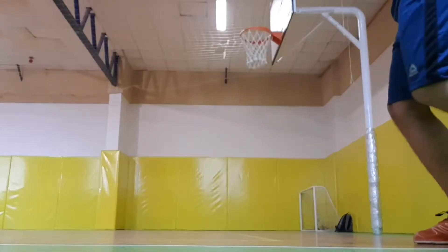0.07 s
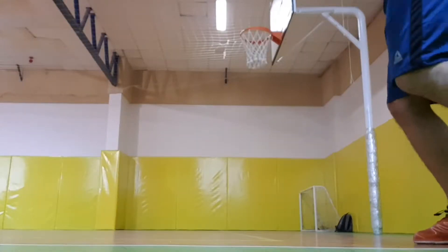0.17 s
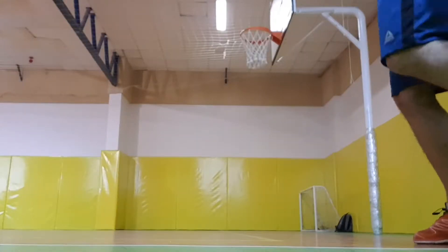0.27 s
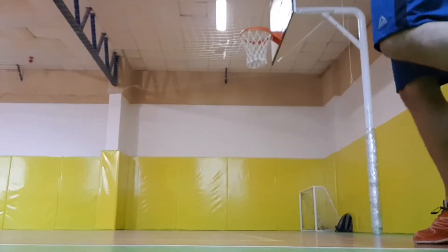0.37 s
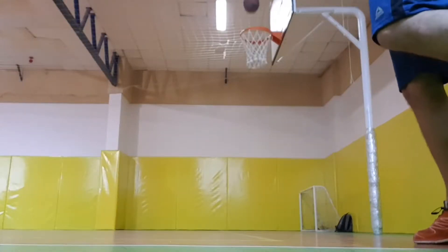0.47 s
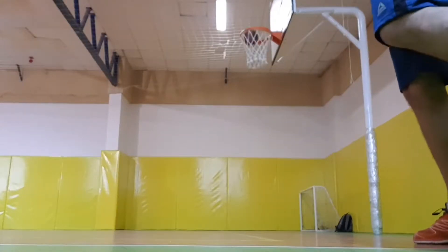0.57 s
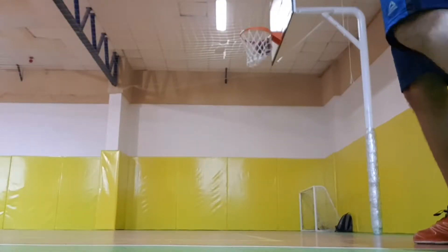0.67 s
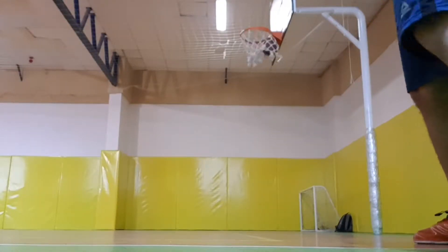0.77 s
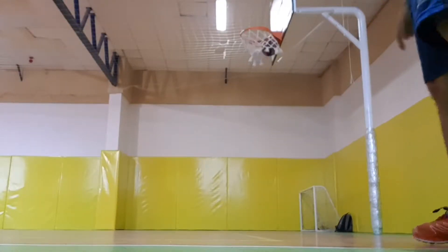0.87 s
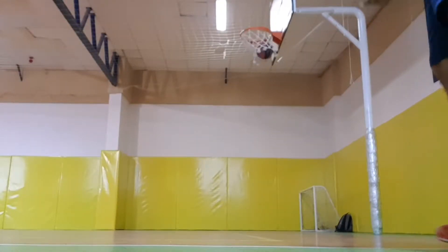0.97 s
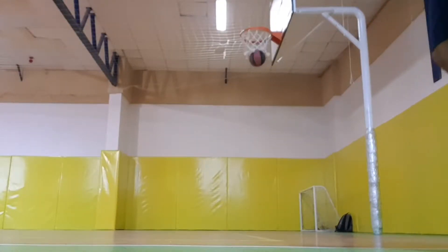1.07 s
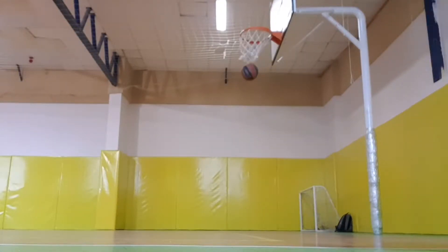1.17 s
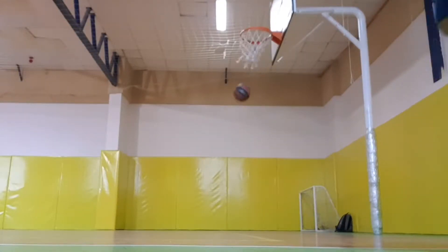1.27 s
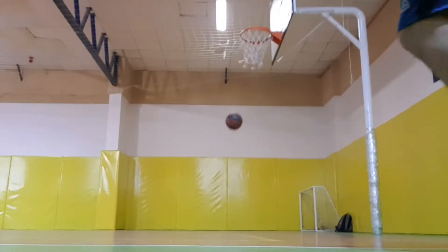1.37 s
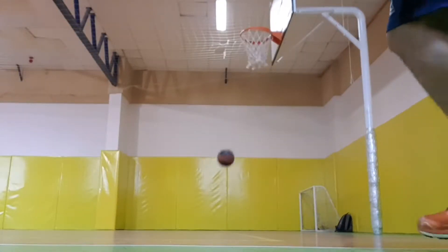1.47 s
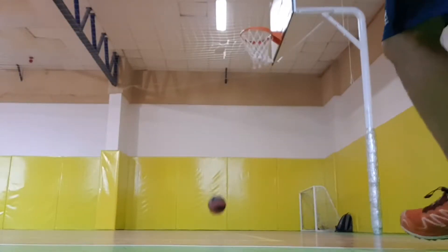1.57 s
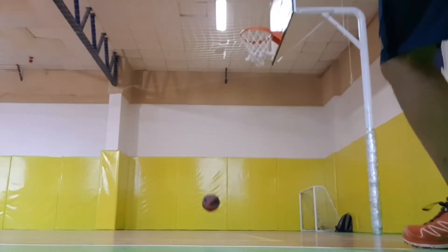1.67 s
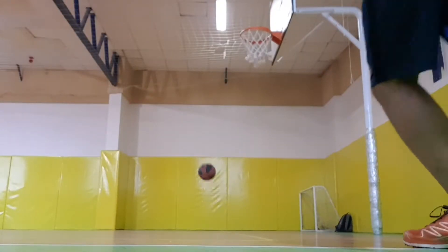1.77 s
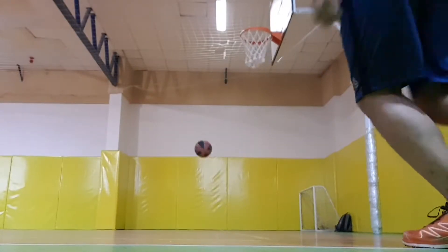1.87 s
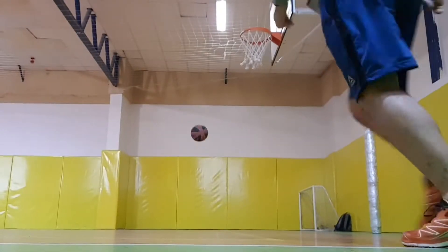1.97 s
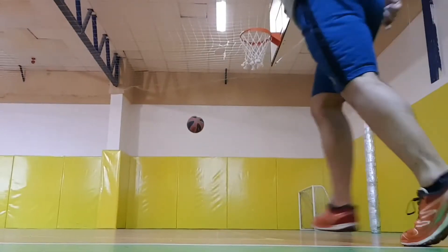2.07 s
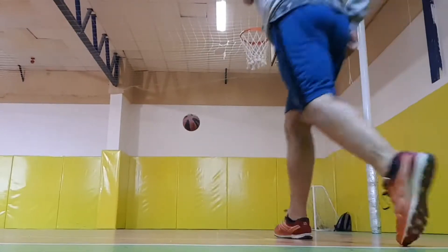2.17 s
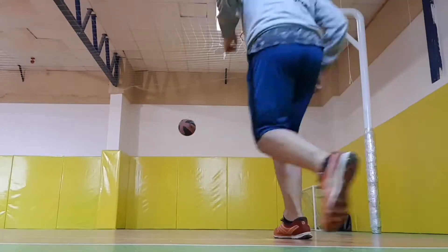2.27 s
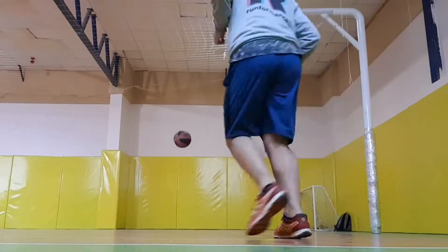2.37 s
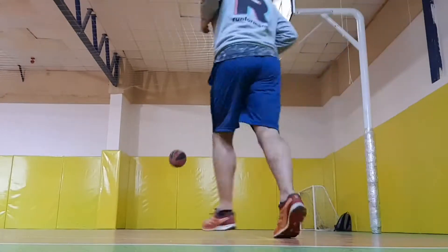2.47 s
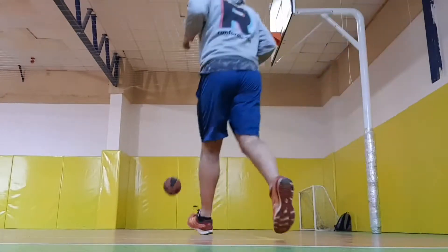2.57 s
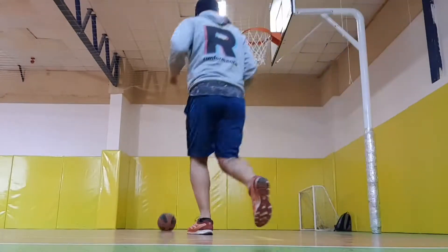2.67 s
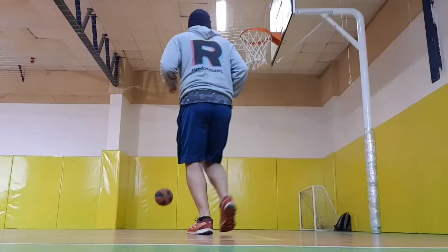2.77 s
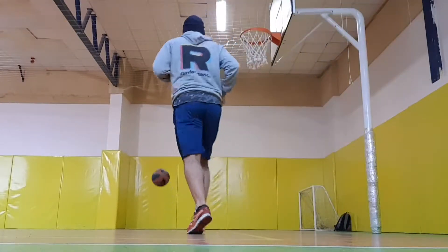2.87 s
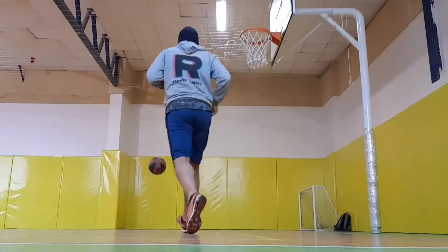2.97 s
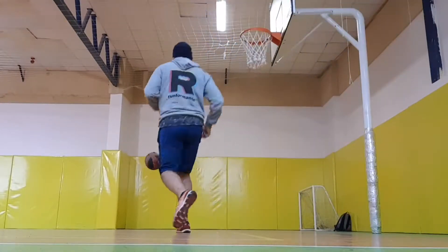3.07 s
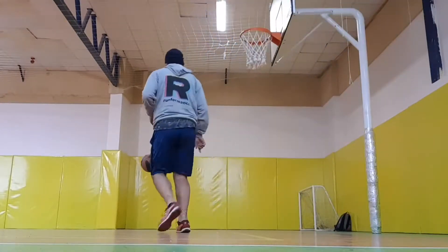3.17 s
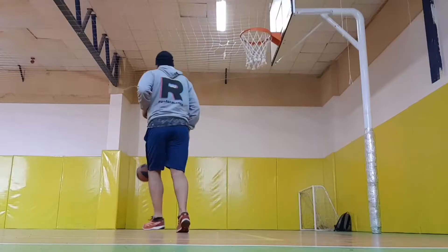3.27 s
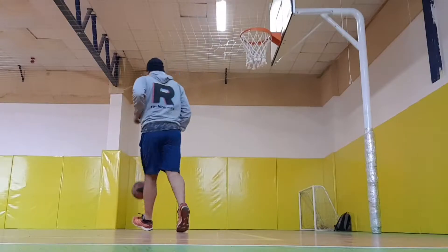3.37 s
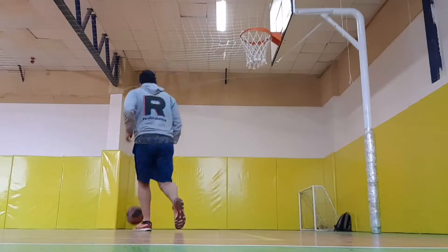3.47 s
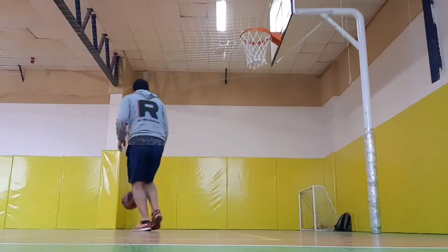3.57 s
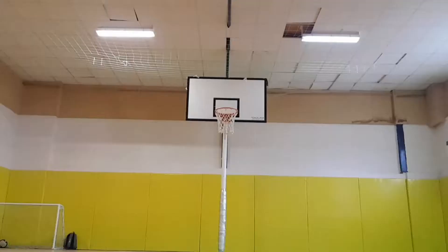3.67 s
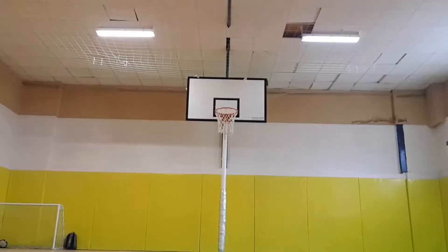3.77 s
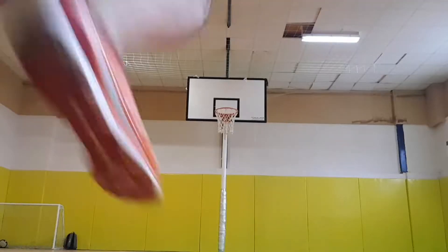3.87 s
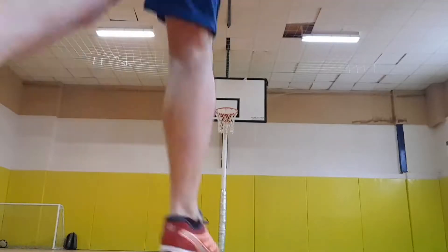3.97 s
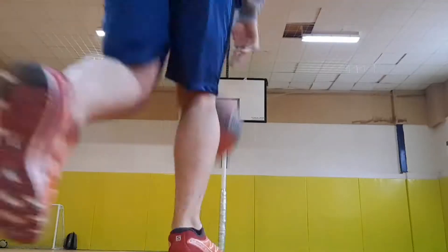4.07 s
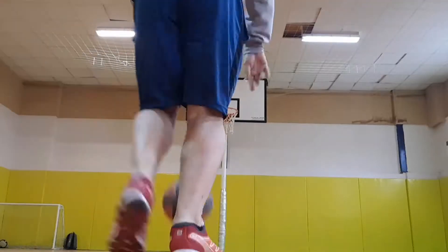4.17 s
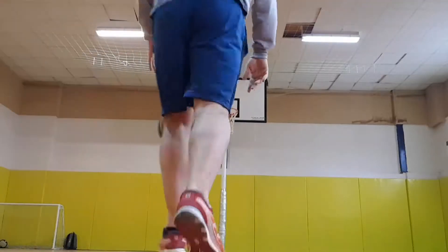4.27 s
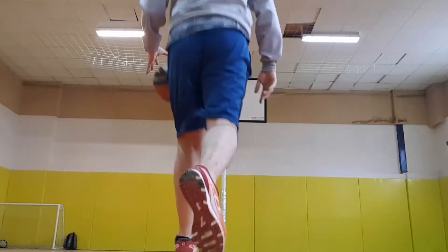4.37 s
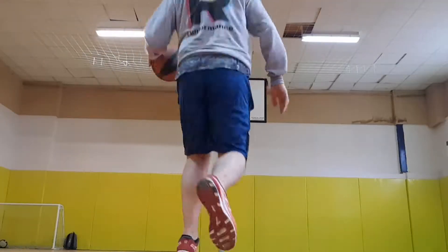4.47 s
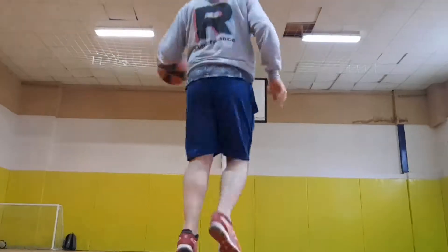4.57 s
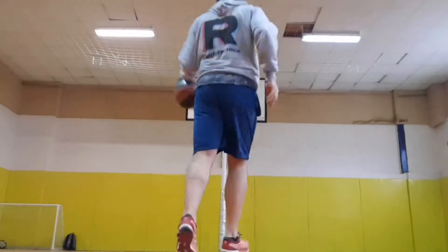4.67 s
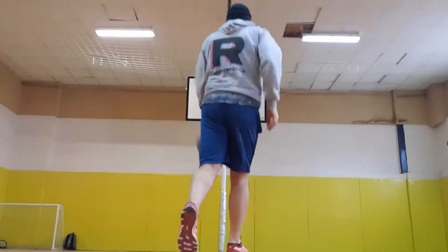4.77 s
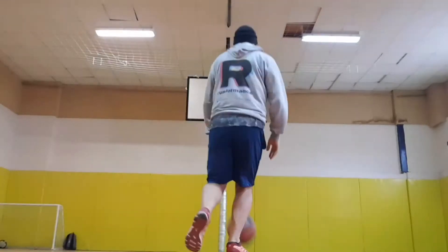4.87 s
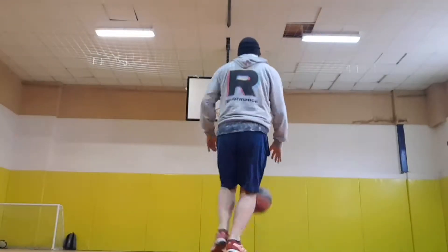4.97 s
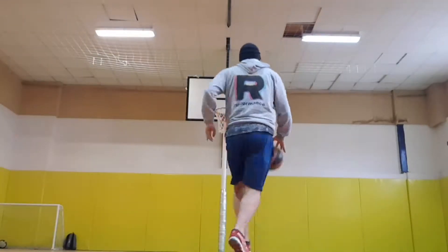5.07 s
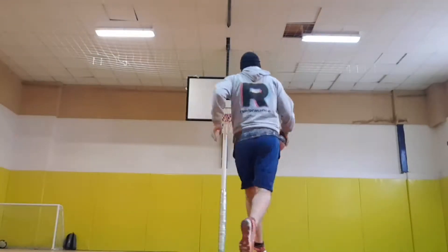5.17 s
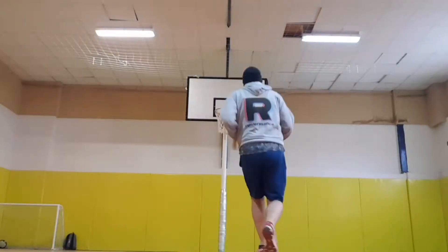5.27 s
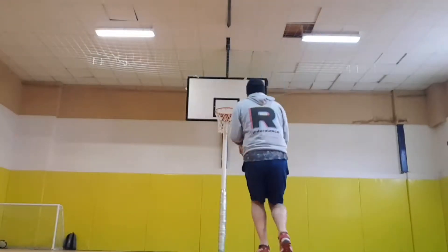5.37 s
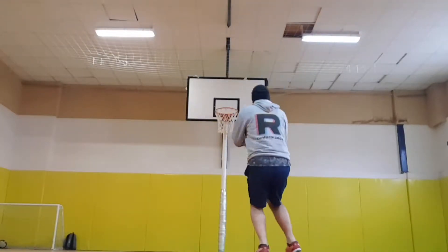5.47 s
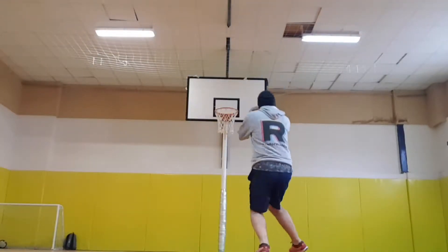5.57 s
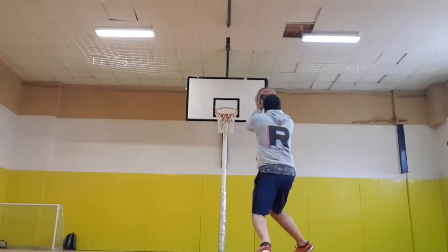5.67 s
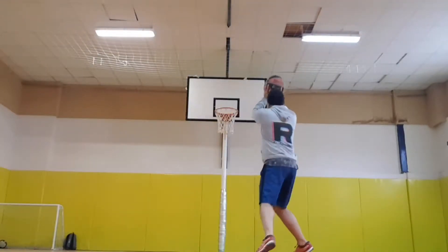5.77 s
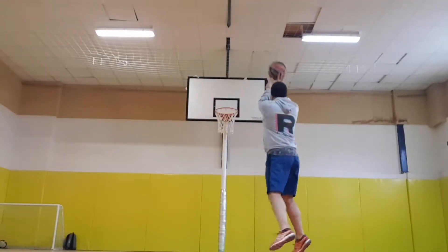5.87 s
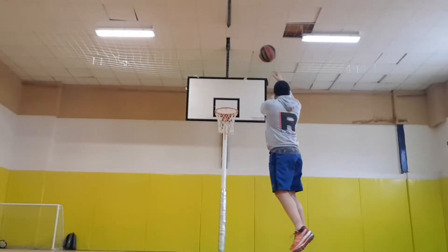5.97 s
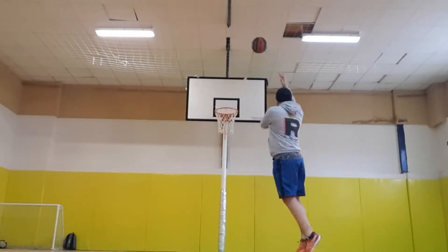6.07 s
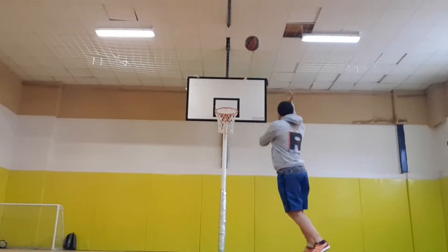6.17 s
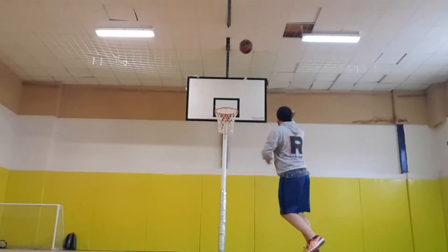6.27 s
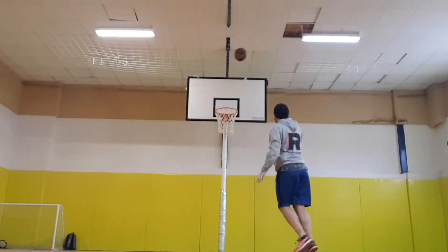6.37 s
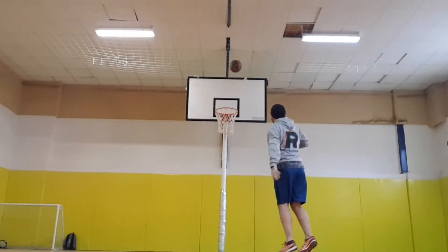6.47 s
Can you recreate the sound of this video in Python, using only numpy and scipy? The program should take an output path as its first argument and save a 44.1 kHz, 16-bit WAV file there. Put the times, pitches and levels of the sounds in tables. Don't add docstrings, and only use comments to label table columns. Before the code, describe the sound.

In an echoing sports hall, shoes tap, a basketball rattles the metal rim and backboard, then bounces away; footsteps and dribbling follow.

```python
import sys
import numpy as np
from scipy import signal
from scipy.io import wavfile
from scipy.ndimage import uniform_filter1d

SR = 44100
rng = np.random.default_rng(int(sys.argv[2]) if len(sys.argv) > 2 else 0)


def volts(x):
    e = np.asarray(x, float) / 20
    return 10 ** e


def bounce(signal):
    frames = np.transpose(np.atleast_2d(signal))
    limited = np.clip(frames, -1, 1)
    pcm = np.round(limited * 32767).astype(np.int16)
    wavfile.write(sys.argv[1], SR, pcm)


N = 287532

# frequency in Hz, 60 dB decay time in s.
HALL_T60 = [(30, 1.37), (110, 0.8), (280, 1.014), (700, 0.63), (1400, 1.206), (2500, 1.38), (4500, 1.13),
            (7500, 0.75), (14000, 0.24)]
# frequency in Hz, level in dB.
HALL_TONE = [(30, -6.5), (60, 7), (120, 4.5), (300, 5), (450, 3.5), (780, -1), (1150, -0.5), (2500, -0.5),
             (4000, 4.5), (5800, 2.5), (8000, -3.5), (12000, -2), (15500, -10)]
# frequency in Hz, correlation from -1 to 1.
LIKENESS = [(60, .995), (130, .98), (290, .88), (640, .2), (1410, -.2), (3100, .15), (6820, .05),
            (15000, .1)]
SPARSE_DB, SPARSE_S = 3, 0.1

# frequency in Hz, density in dB per Hz.
AIR_COLOUR = [(13, -39), (22, -5), (48, -8.5), (70, -16.5), (90, -7.5), (109, 1), (140, -19), (174, -22.5),
              (286, -30), (319, -32), (672, -35.5), (1540, -40.5), (5610, -40), (14700, -54.5),
              (16000, -51.5)]
AIR_DB, HISS_DB = -65.5, -80
# frequency in Hz, density in dB per Hz.
EARLIER_COLOUR = [(35, -57.5), (60, 0), (266, -5), (295, -12.5), (349, -0.5), (404, -15.5), (458, -4.5),
                  (565, -8.5), (1180, -15.5), (1280, -18.5), (1510, -17.5), (1990, -21.5), (2350, -14.5),
                  (3500, -25), (9000, -44.5), (11700, -64), (19800, -120)]
EARLIER_DB = -43.5
SQUEAK_HZ, SQUEAK_DB, SQUEAK_T60_S = 2350, -54, 1.4

# time of full level in seconds, level in dB, hold in seconds, fall in dB/s.
RUSTLES = [(0.001, -65, 0.01, 120), (1.29, -66, 0.043, 80), (2.534, -82, 0.034, 189.5),
           (3.745, -71.5, 0.0091, 802), (3.808, -76.5, .005, 90), (3.95, -80.5, 0.058, 245),
           (4.114, -69.5, 0.006, 800), (5.40, -75.5, .11, 405), (6.495, -76.5, .03, 398)]
# frequency in Hz, density in dB per Hz.
CLOTH_COLOUR = [(880, -38), (1500, -17), (1740, -36.5), (2000, 8.5), (2740, -2.5), (3480, 2.5),
                (9850, -9.5), (16000, -8)]
# time of full level in seconds, level in dB, hold in seconds, fall in
# dB/s.
SCUFFS = [(2.70, -49, .005, 40), (3.527, -48.5, .003, 124), (4.903, -50, 0.0034, 227),
          (5.44, -42.5, 0.0093, 290), (5.51, -67, .002, 150), (6.228, -53.5, 0.084, 72),
          (6.51, -60.5, 0.022, 198)]
# frequency in Hz, density in dB per Hz.
SOLE_COLOUR = [(71, -44), (120, -24), (156, 0), (305, -3), (353, -2.5), (607, -5.5), (1080, -17),
               (1940, -11.5), (2830, -33), (6000, -38), (7800, -98), (13200, -120)]
RUSTLE_RISE_DB_PER_S, SCUFF_RISE_DB_PER_S = 604, 700

# time in seconds, level in dB, colour in Hz.
RIM_KNOCKS = [(0.632, -41.5, 1380), (0.658, -29, 2330), (0.655, -31, 5260), (.683, -16.5, 1404),
              (.705, -16, 1514), (0.712, -13.5, 1147), (0.73, -19, 1475), (.736, -17.5, 1252),
              (0.735, -24.5, 2637), (.744, -18, 1195), (.763, -33, 1070), (0.772, -27.5, 1650),
              (0.8, -30, 1507), (0.815, -30, 1600), (0.83, -40.5, 1556), (0.86, -35, 1264),
              (.885, -41.5, 2136), (0.893, -33, 2380)]
# frequency in Hz, width in Hz, level in dB.
RIM_MODES = [(984, 39, -8), (1252, 84, 2), (1430, 35, -12), (1640, 130, -18), (2330, 29, -15.5),
             (2836, 70, -19.5), (3290, 28, -24), (4020, 280, -15)]
# frequency in Hz, level in dB, relative decay (1 is 0.019 s for 60
# dB).
PANEL_MODES = [(114, -3.5, 0.19), (222.3, -2, 3), (286, -2, 2.2), (405, -0.5, 1.2), (517, -6, 0.57),
               (609, 2, 0.53), (692, -17, 2.1), (785, -4.5, 0.41)]
# time in seconds, level in dB.
SHUDDER = [(.63, -66.5), (.66, -33), (.70, -30), (.74, -31), (.80, -31), (.9, -42.5), (1.1, -55),
           (1.3, -54), (1.6, -67)]
# frequency in Hz, level in dB.
HOOP_MODES = [(1152, -83), (1335, -78.5), (1556, -93.5), (2094, -85.5), (2724, -91.5), (3391, -95)]
HOOP_T60_S = 0.035
POST_HZ, POST_DB = 48.9, -44.5
KNOCK_MS, KNOCK_SHRINK_MS_PER_S = 15, 15
KNOCK_LEAD_S, KNOCK_CYCLES = 0.0035, 7.1

# time in seconds, tick level in dB, thud
# level in dB, tick pitch in Hz.
LANDINGS = [(0.0658, -22.5, -35.5, 2560), (1.255, -39, -35, 2010), (1.3175, -34.5, -31, 1525),
            (2.2341, -28, -41, 1940), (2.2668, -32.5, -34, 1370), (2.6749, -43, -55, 1790),
            (2.7016, -30, -43.5, 2010), (3.111, -21, -39.5, 2010), (3.5273, -60, -39.5, 1090),
            (3.7044, -27, -34.5, 1490), (3.7216, -31, -31, 1960), (4.015, -50, -48.5, 1740),
            (4.1001, -69, -45.5, 2530), (4.122, -35.5, -39, 2420), (4.8668, -45.5, -60, 1460),
            (4.9049, -30, -38, 1240), (5.4274, -19, -27.5, 1175), (5.4506, -37, -42, 1105),
            (5.7302, -39, -49.5, 1158), (6.2093, -55, -69.5, 1160), (6.2291, -65.5, -43, 990),
            (6.2369, -37.5, -56, 1760)]
# time in seconds, level in dB, pitch in Hz, left-right in dB.
TICKS = [(0.0084, -22, 2330, 10), (0.197, -34.5, 2300, 6), (1.3088, -24.5, 2160, 17),
         (2.5456, -47, 2710, 23.5), (2.564, -32.5, 3420, 4), (2.6914, -33.5, 1550, -.5),
         (3.484, -39, 2030, 1), (3.8232, -39.5, 1740, -19), (4.1142, -31, 1704, -4),
         (4.1984, -43, 2540, -17), (4.8986, -24, 1580, -3), (5.9129, -42, 2470, -22.5),
         (6.2666, -36.5, 1870, -8), (6.492, -38, 1077, -9), (6.5104, -35.5, 1030, -9)]
# time in seconds, left-right in dB, tail level in dB.
PLAYER = [(0, 4, -18.5), (1.3, 2.5, -12), (2.25, 2.5, -8.5), (2.7, -3, -10), (3.72, -2, -2.5),
          (4.0, -3, -17), (4.15, -2, -11.5), (4.9, -3, -4), (6.3, -2, -1.5)]
TICK_THUD_DB, TICK_TAIL_DB = -35, -4

# time in seconds, slap level in dB, thump level in dB, thump pitch in Hz, tail in dB.
BOUNCES = [(1.7200, 1, -8.5, 146, -3.5), (2.781, -1.5, -16, 130, -4), (3.6013, -9.5, -19.5, 123, -4),
           (4.2587, -7.5, -15.5, 132.5, -11), (5.0177, -4.5, -15, 142, -4)]
# frequency in Hz, level in dB, relative decay (1 is 0.25 s for 60 dB).
BALL_MODES = [(1097, -14.5, 0.48), (1253, -6, 0.16), (1330, -14.5, 0.31), (1470, -0.5, 0.064),
              (1740, -8, 0.12), (2040, 5, 0.022), (2700, -16, 0.25)]
# frequency in Hz, level in dB, relative decay (1 is 0.77 s for 60 dB).
BOARD_MODES = [(117, 5.5, 0.17), (213.8, -10, 1), (303.6, -22, 0.16), (443, -11.5, 0.37)]
# delay in ms, change in ms/s as the ball travels, slap loss in dB, colour in Hz,
# lag of the left ear in ms.
WALLS = [
    [(8.77, 1, -4, 2800, -0.39), (35.76, 0.4, -12, 2600, -.4), (69.4, -0.1, -15.5, 3300, 0.36)],
    [(11.08, -2, -13.5, 1600, 0.16), (24.8, -0.9, -16, 3800, 0.19), (43.8, -0.5, -24, 1800, -.3),
     (53.6, -4, -25.5, 6000, -.1), (54.8, 2.5, -36, 1100, 0.35), (66, 6, -23.5, 3700, 0.33)],
]
MOVE_S, MOVE_DB = 3.74, -5.5
THUMP_FADE_MS = 32

PLACE_S = (1.72, 4.2591)
BALL_PAN_DB = (0.4, 2.1)
CORNER_HZ, CORNER_DB = 149.7, (1.5, -4.5)
FILL_S = (0.014, 0.023)
THUMP_SHARE, BASS_TAIL_DB = (1.9, 1), (-3.5, 0.5)
MIRROR_SHARE = (0.36, 0.072)


def unit(x):
    return x / np.sqrt(np.mean(x ** 2) + 1e-20)


def at_hz(points, hz):
    table = np.array(points)
    return np.interp(np.log(hz), np.log(table[:, 0]), table[:, 1])


def level(rows):
    s, db = np.transpose(rows)
    return volts(np.interp(np.arange(N) / SR, s, db, left=-200, right=-200))


def swell(s, db, hold_s, fall_db_per_s, rise_db_per_s):
    t = np.arange(N) / SR - s
    rise_db = rise_db_per_s * np.maximum(-t, 0)
    fall_db = fall_db_per_s * np.maximum(t - hold_s, 0)
    return volts(db - rise_db - fall_db)


def impulse(size):
    return np.eye(1, size)[0]


def pulse(ms):
    return np.hanning(round(ms * SR / 1000) + 2)[1:-1]


def ring(x, hz, t60):
    radius, angle = volts(-60 / (t60 * SR)), 2 * np.pi * hz / SR
    feedback = [1, -2 * radius * np.cos(angle), radius * radius]
    return signal.lfilter([0, np.sin(angle)], feedback, x + 1e-18)


def butter(x, order, hz, kind="low"):
    return signal.sosfilt(signal.butter(order, hz, kind, fs=SR, output="sos"), x)


def bands(size, shape):
    mids, sides = 0, 0
    edges = 22 * 2 ** (np.arange(30) / 3)
    white = rng.standard_normal((2, 2, size))
    for k, (low, high) in enumerate(zip(edges, edges[1:])):
        mid, side = butter(white[k % 2], 2, [low, high], "band")
        hz = np.sqrt(low * high)
        alike = np.clip(at_hz(LIKENESS, hz), -1, 1)
        gain = shape(hz)
        mids = mids + gain * np.sqrt(1 + alike) * mid
        sides = sides + gain * np.sqrt(1 - alike) * side
    return np.array([mids + sides, mids - sides])


def hall(x, fill_s=0.0021):
    t = np.arange(round(1.5 * SR)) / SR
    uneven = unit(uniform_filter1d(rng.standard_normal(len(t)), size=130)) - 0.6
    lumps_db = SPARSE_DB * np.exp(-t / SPARSE_S) * uneven

    def shape(hz):
        fill = 1 - np.exp(-(t / (fill_s + 3.8 / hz)) ** 2)
        early = 1 + 0.18 * np.exp(-t / 0.036)
        lumpy_db = np.clip(hz / 1500, 0, 1) * lumps_db
        decay_db = t * 60 / at_hz(HALL_T60, hz)
        return fill * early * volts(lumpy_db + at_hz(HALL_TONE, hz) - decay_db)

    return signal.fftconvolve(x[None], 0.031 * bands(len(t), shape), axes=1)


def add(out, x, s, pan_db=0., lag_ms=0.):
    for ch, side in enumerate((1, -1)):
        at = max(round((s + side * lag_ms / 2000) * SR), 0)
        one = (x[ch] if x.ndim > 1 else x)[:N - at]
        out[ch, at:at + len(one)] += one * volts(side * pan_db / 2)


def air():
    hiss = butter(rng.standard_normal((2, N)), 2, [8500, 15500], "band")
    rumble = bands(N, lambda hz: volts(at_hz(AIR_COLOUR, hz)))
    return volts(AIR_DB) * unit(rumble) + volts(HISS_DB) * unit(hiss)


def earlier():
    t = np.arange(SR) / SR
    tail = bands(SR, lambda hz: volts(at_hz(EARLIER_COLOUR, hz) - 80 * t / at_hz(HALL_T60, hz)))
    tail = volts(EARLIER_DB) * tail / np.std(tail[:, :SR // 10])
    squeak = unit(ring(rng.standard_normal((2, SR)), SQUEAK_HZ, 0.006))
    squeak = squeak * volts(SQUEAK_DB - t * 60 / SQUEAK_T60_S)
    return np.pad(tail + squeak, ((0, 0), (0, N - SR)))


def rub(strokes, rise_db_per_s, colour, lift_db):
    grain = volts(3.0 * unit(uniform_filter1d(rng.standard_normal(N), size=150)))
    pressure = sum(swell(*stroke, rise_db_per_s) for stroke in strokes)
    noise = unit(bands(N, lambda hz: volts(at_hz(colour, hz))))
    return pressure * grain * volts(lift_db) * noise


def cloth():
    return rub(RUSTLES, RUSTLE_RISE_DB_PER_S, CLOTH_COLOUR, lift_db=13.5)


def soles():
    return rub(SCUFFS, SCUFF_RISE_DB_PER_S, SOLE_COLOUR, lift_db=1.5)


def steps():
    out, sent = np.zeros((2, N)), np.zeros((2, N))
    t = np.arange(round(0.08 * SR)) / SR
    click = impulse(len(t))
    when, pans_db, tails_db = np.transpose(PLAYER)
    rows = [(s, db, thud_db, hz, np.interp(s, when, pans_db), 0) for s, db, thud_db, hz in LANDINGS]
    rows += [(s, db, db + TICK_THUD_DB, hz, pan_db, TICK_TAIL_DB) for s, db, hz, pan_db in TICKS]
    grits = rng.standard_normal((len(rows), len(t)))
    for (s, tick_db, thud_db, hz, pan_db, extra_db), grit in zip(rows, grits):
        tail_db = np.interp(s, when, tails_db) + extra_db
        heavy = min(volts(thud_db - tick_db), 1)
        drag_s = 0.0010 + 0.003 * heavy
        burst = signal.lfilter([1], [1, -0.15 - 0.22 * np.sqrt(heavy)], grit * np.exp(-t / drag_s))
        tick = butter(ring(burst, hz, 4 / hz) + 0.4 * burst, 2, 6000)
        heel = np.convolve(-click + 0.5 * burst, pulse(1.4))[:len(t)]
        thud = ring(heel, 240, 0.012) + 1.6 * ring(heel, 477, 0.017) + 0.76 * ring(heel, 740, 0.017)
        tick *= volts(tick_db - 7.0) / abs(tick).max()
        thud *= volts(thud_db + 5) / abs(thud).max()
        add(out, tick + thud, s, pan_db)
        smooth = ring(click, hz, 3.7 / hz)
        add(sent, volts(tail_db) * (np.std(tick) * unit(smooth) + 0.59 * thud), s)
    return out + hall(sent[0])[:, :N]


def rim_knocks():
    knocks = np.zeros((2, N))
    grits = rng.standard_normal((len(RIM_KNOCKS), 1500))
    for (s, db, hz), grit in zip(RIM_KNOCKS, grits):
        push = pulse(np.clip(KNOCK_MS - KNOCK_SHRINK_MS_PER_S * (s - RIM_KNOCKS[0][0]), 5, 24))
        push = np.pad(push, (0, 1500 - len(push)))
        knock = ring(grit * push, hz, KNOCK_CYCLES / hz)
        add(knocks, volts(db) * knock / abs(knock).max(), s - KNOCK_LEAD_S)
    return knocks[0]


def hoop():
    knocks = rim_knocks()
    chatter = rng.standard_normal(N) * level(SHUDDER)
    dry = volts(-12.5) * signal.lfilter([0.4], [1, -0.6], chatter) + volts(0.5) * knocks
    dry += volts(-20) * butter(chatter, 2, [3000, 7000], "band")
    dry += butter(chatter, 2, [700, 1900], "band")
    for hz, width_hz, db in RIM_MODES:
        t60 = 2.2 / (width_hz + 110)
        dry += volts(db - 38.0) * ring(knocks + 2 * chatter, hz, t60)
    for hz, db, t60 in PANEL_MODES:
        dry += volts(db - 21.0) * ring(chatter, hz, 0.019 * t60)
    dry += volts(POST_DB) * ring(chatter, POST_HZ, 1.6)
    pluck = rng.standard_normal(N) * level([(1.38, -38), (1.45, -29.5), (1.55, -34.5), (1.7, -46)])
    dry += sum(volts(db + 31.5) * ring(pluck, hz, HOOP_T60_S) for hz, db in HOOP_MODES)
    return dry * volts(np.array([[-0.7], [0.7]])) + volts(-6.5) * hall(dry)[:, :N]


def scattered(hz):
    t = np.arange(round(0.02 * SR)) / SR
    grit = rng.standard_normal(len(t)) * np.exp(-t / 0.0012)
    back = ring(grit, hz, 1.5 / hz) + 0.9 * grit + 0.25 * ring(grit, 1150, 0.006)
    back = butter(back, 2, 2 * hz)
    return back / abs(back).max()


def slap(slap_db, size):
    t, click = np.arange(size) / SR, impulse(size)
    snap = -np.convolve(click, pulse(0.3))[:size] - 0.5 * ring(click, 3490, 0.0015)
    snaps = snap + 0.43 * np.roll(snap, round(0.0006 * SR)) + 0.41 * np.roll(snap, round(0.0008 * SR))
    crackle = signal.lfilter([0.09], [1, -0.45], rng.standard_normal(size) * np.exp(-t / 0.0015))
    ping = sum(volts(db - 22 + rng.normal(0, 1.4)) * ring(click, hz, 0.25 * t60) for hz, db, t60 in BALL_MODES)
    near = butter(snaps + crackle, 1, 6000)
    all_ways = volts(4) * ring(click, 1200, 0.00049) + 0.048 * click + ping
    all_ways += volts(-1 + 0.63 * slap_db) * butter(click, 2, 7500, "high")
    return volts(slap_db) * (near + ping), volts(slap_db) * all_ways


def thump(thump_db, thump_hz, corner_db, size):
    push = np.convolve(np.roll(impulse(size), round(0.0014 * SR)), unit(pulse(1.485)) / 60)[:size]
    body = ring(push, thump_hz, 0.041) + volts(-4.5) * ring(push, 239, 0.031)
    body += volts(-13.5) * ring(push, 376.5, 0.043) + volts(-4.5) * ring(push, 480, 0.026)
    boards = sum(volts(db - 16.5 + rng.normal(0, 1)) * ring(push, hz, 0.77 * t60) for hz, db, t60 in BOARD_MODES)
    answer = np.roll(push, round(0.0092 * SR))
    boom = volts(thump_db + corner_db) * ring(answer, CORNER_HZ, 0.082)
    return volts(thump_db) * (body + boards), boom


def ball():
    out, size = np.zeros((2, N)), round(0.5 * SR)
    for s, slap_db, thump_db, thump_hz, tail_db in BOUNCES:
        one, place = np.zeros((2, N)), int(s > MOVE_S)
        high, all_ways = slap(slap_db, size)
        low, boom = thump(thump_db, thump_hz, CORNER_DB[place], size)
        add(one, high + low + boom, s, BALL_PAN_DB[place])
        for delay_ms, ms_per_s, loss_db, hz, lag_ms in WALLS[place]:
            echo_s = s + (delay_ms + ms_per_s * (s - PLACE_S[place])) / 1000
            add(one, volts(slap_db + loss_db - 1.5) * scattered(hz), echo_s, 0, lag_ms)
            share = THUMP_SHARE[place] * np.exp(-delay_ms / THUMP_FADE_MS)
            add(one, share * (low + MIRROR_SHARE[place] * high), echo_s, 0, lag_ms)
        sent = all_ways + volts(BASS_TAIL_DB[place]) * (low + boom)
        add(one, volts(tail_db) * hall(sent, FILL_S[place]), s)
        if s < MOVE_S:
            one[:, round(MOVE_S * SR):] *= volts(MOVE_DB)
        out += one
    return out


def scene():
    return air() + earlier() + cloth() + soles() + steps() + hoop() + ball()


def roll_off(x):
    return signal.sosfilt(signal.butter(12, 16830, fs=SR, output="sos"), x)


def record(dry):
    cut = butter(dry, 3, 42, "high")
    cut = signal.sosfilt(signal.cheby2(10, 60, 16800, fs=SR, output="sos"), cut)
    return roll_off(np.clip(cut, -1, 1))


dry = scene()
out = record(dry)
bounce(out)
```